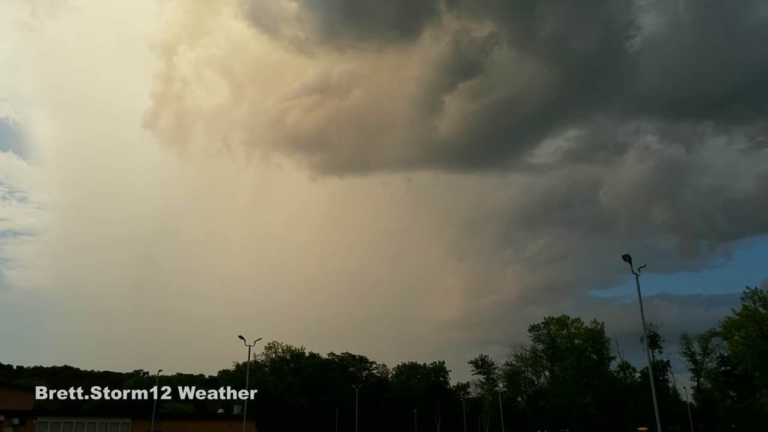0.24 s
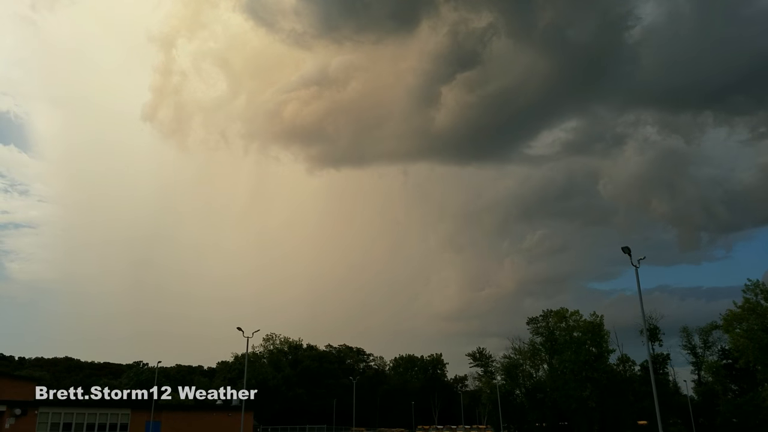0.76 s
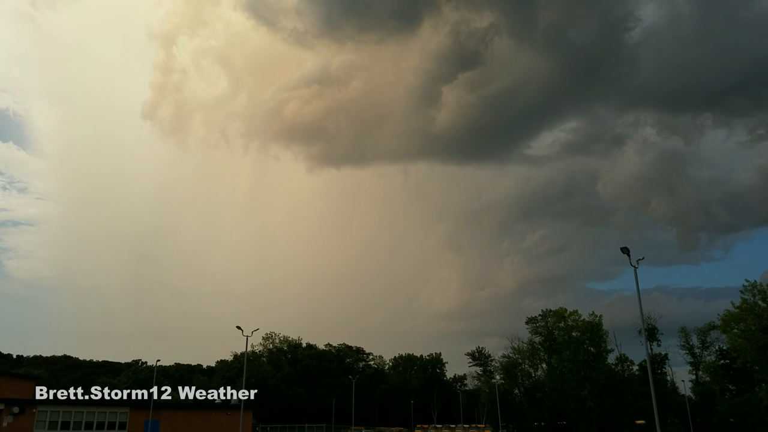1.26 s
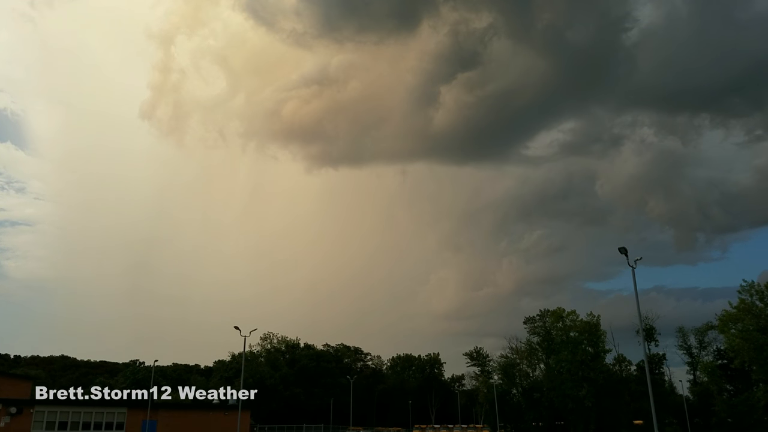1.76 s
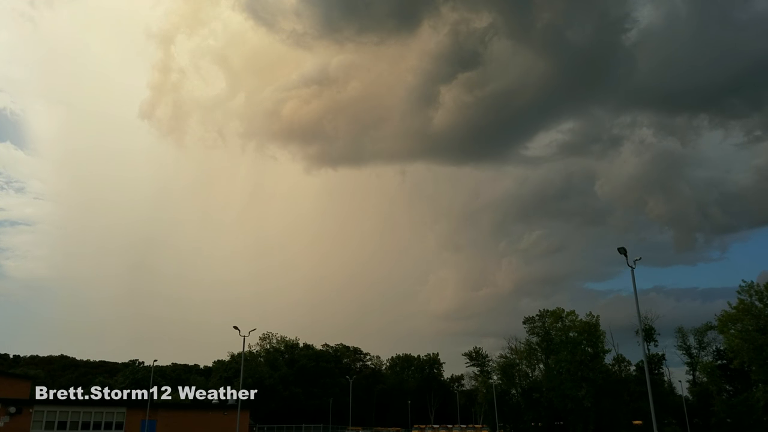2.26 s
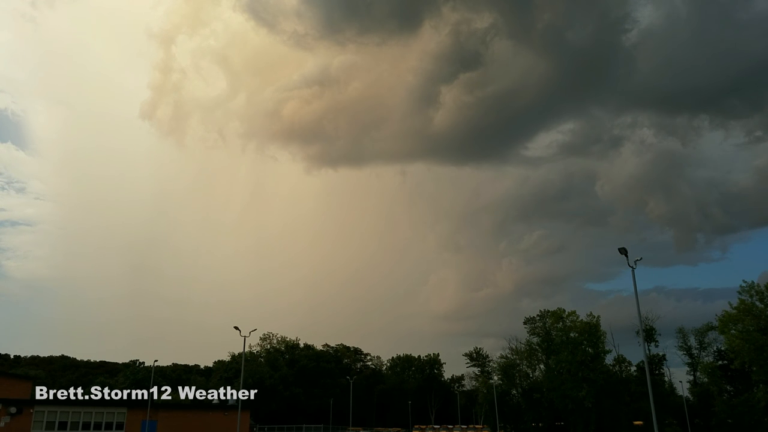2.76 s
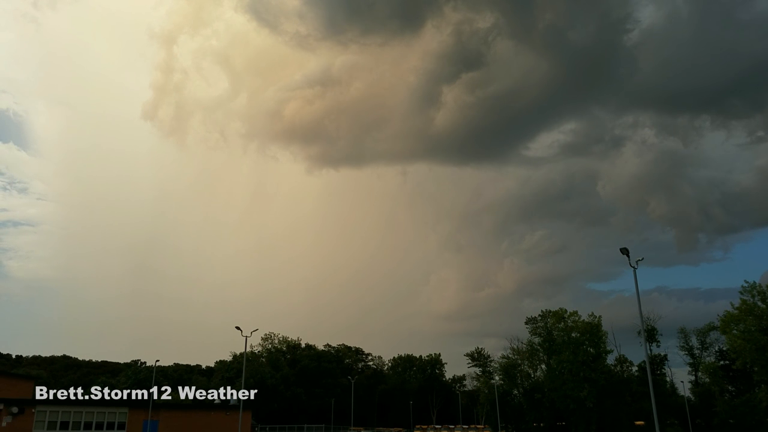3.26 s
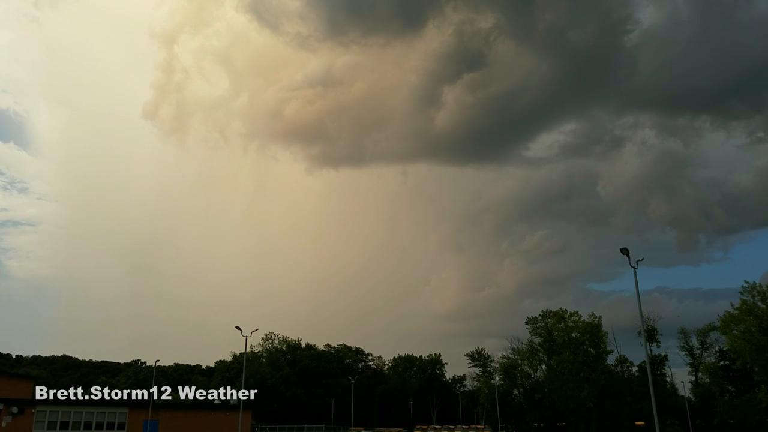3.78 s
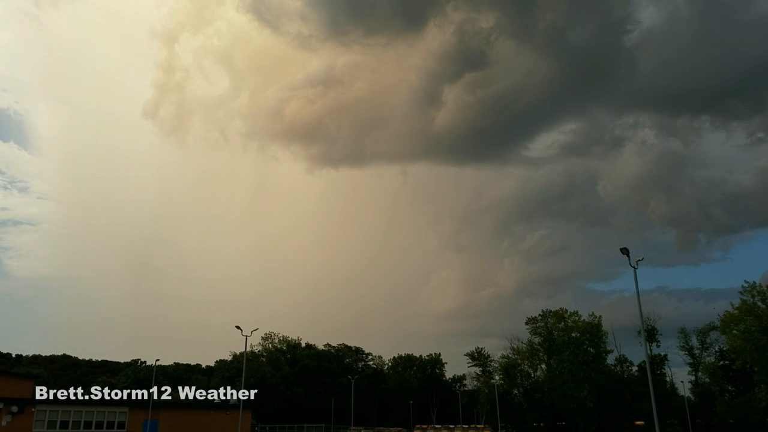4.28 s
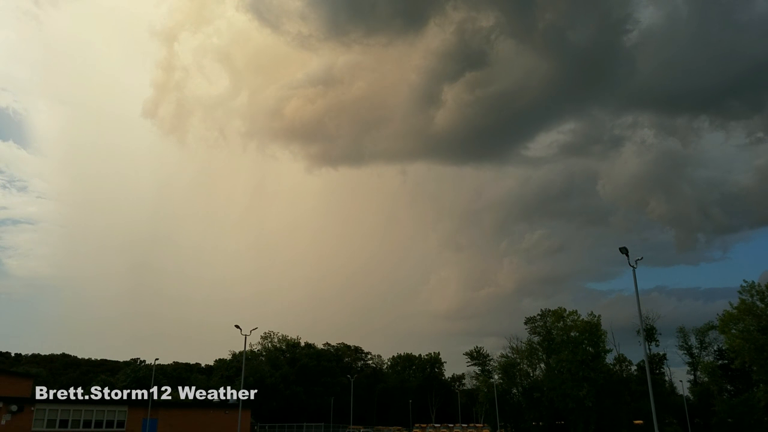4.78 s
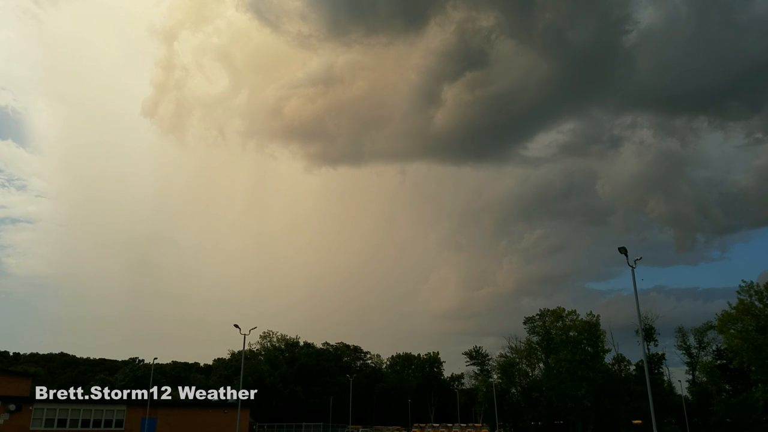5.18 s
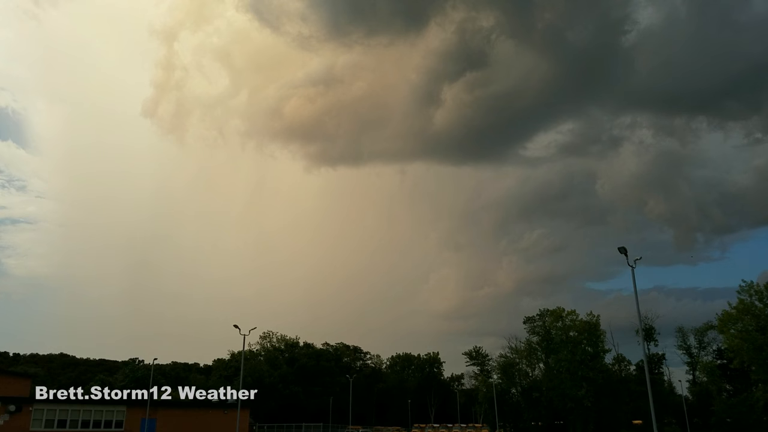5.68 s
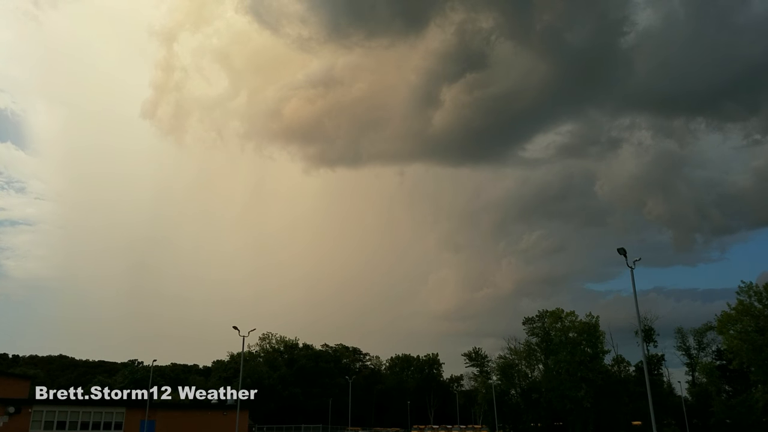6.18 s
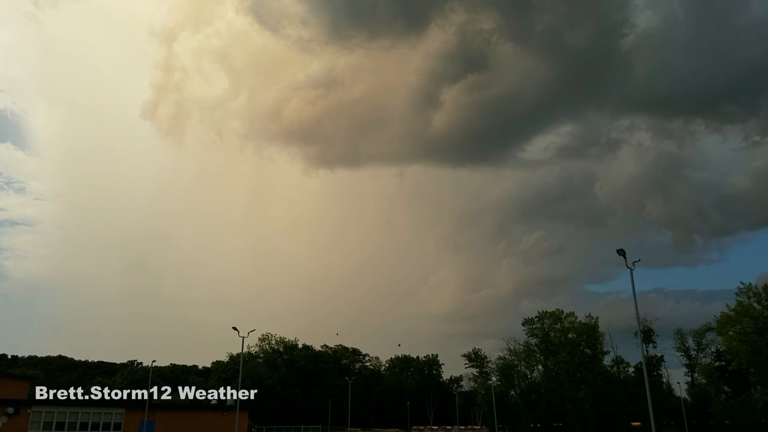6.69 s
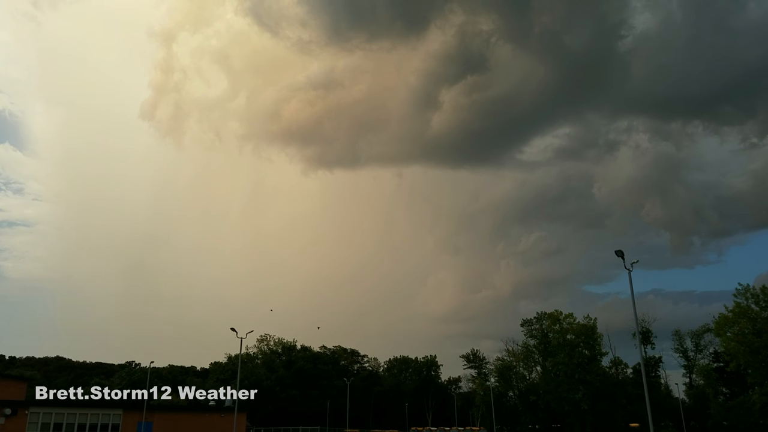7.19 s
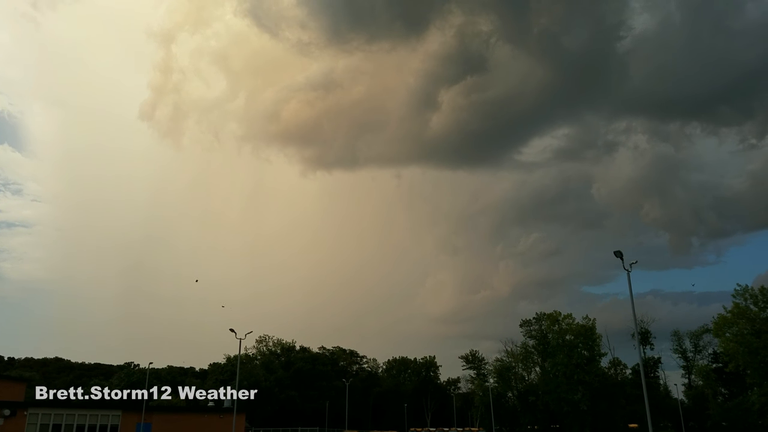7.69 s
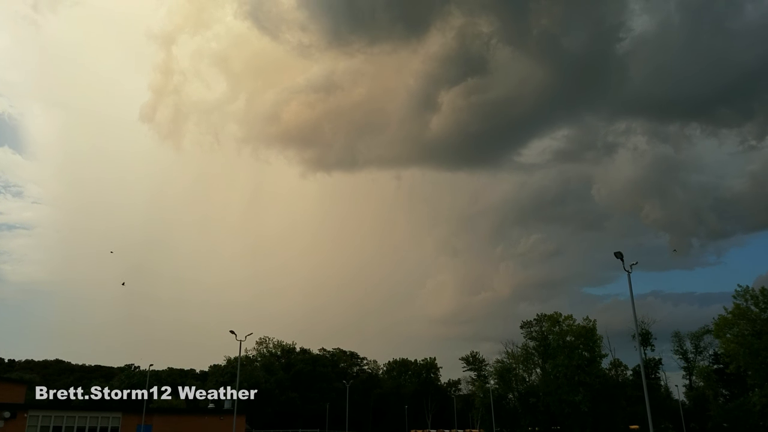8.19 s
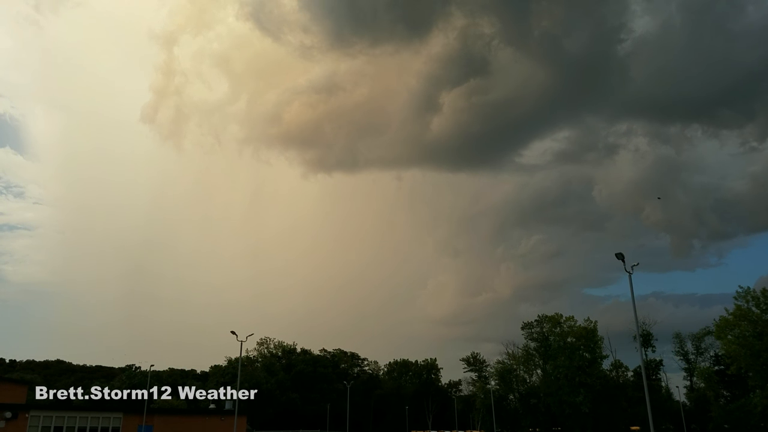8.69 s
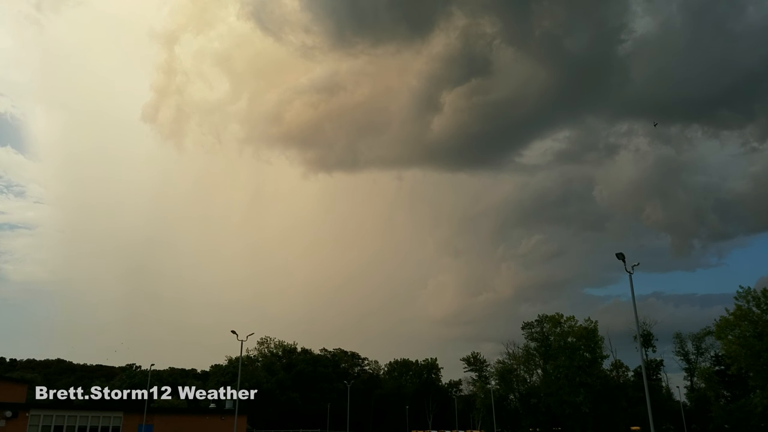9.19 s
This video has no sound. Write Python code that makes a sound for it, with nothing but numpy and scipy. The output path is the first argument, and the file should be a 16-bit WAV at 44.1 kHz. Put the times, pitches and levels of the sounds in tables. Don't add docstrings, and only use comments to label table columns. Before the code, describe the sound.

Violent crackling thunderclap breaks into a long deep rumble, surging again with heavy thuds and later claps, faint leaves and bird calls underneath.

```python
import sys
import numpy as np
from scipy import signal
from scipy.fft import rfft, irfft, next_fast_len
from scipy.io import wavfile
from scipy.ndimage import uniform_filter1d

SR = 44100
rng = np.random.default_rng(int(sys.argv[2]) if len(sys.argv) > 2 else 0)


def digitize_waveform(pressure):
    field = np.atleast_2d(pressure).T
    bounded = np.clip(field, -1, 1)
    quanta = np.round(bounded * 32767).astype(np.int16)
    wavfile.write(sys.argv[1], SR, quanta)


def field_ratio(decibels):
    return 10 ** (np.asarray(decibels, dtype=float) / 20)


N = 416744
T = np.arange(N) / SR
COARSE = T[::32]


def unit(x):
    return x / np.sqrt(np.mean(x ** 2) + 1e-30)


def shape(x, points):
    hz, db = np.transpose(points)
    size = 2 * next_fast_len(x.shape[-1] // 2 + 1)
    f = np.maximum(np.fft.rfftfreq(size, 1 / SR), 1)
    gain = field_ratio(np.interp(np.log(f), np.log(hz), db))
    cepstrum = irfft(np.log(gain), size)
    cepstrum[1:size // 2] *= 2
    cepstrum[size // 2 + 1:] = 0
    return irfft(rfft(x, size) * np.exp(rfft(cepstrum)), size)[..., :x.shape[-1]]


def tint(group, points):
    out = shape(group, points)
    return out * np.sqrt(np.mean(group ** 2) / np.mean(out ** 2))


def walk(rate_hz):
    held = rng.standard_normal(2000)[(COARSE * rate_hz).astype(int)]
    k = int(len(COARSE) / COARSE[-1] / rate_hz)
    return 1.37 * uniform_filter1d(uniform_filter1d(held, k), k)


def add(out, s, piece):
    at = max(int(s * SR), 0)
    angle = np.linspace(0, np.pi / 2, piece.shape[1]) ** 4 / (np.pi / 2) ** 3
    piece = piece * np.cos(angle) ** 2
    out[:, at:at + piece.shape[1]] += piece[:, :N - at]


def pair(s, wave, lag_ms, length_s):
    lag_s = lag_ms[int(s * SR)] / 1000
    t = np.arange(int(length_s * SR)) / SR - .001 + np.array([[-lag_s / 2], [lag_s / 2]])
    return wave(np.maximum(t, 0))


def shocks(length, count, scatter_db, lag_ms, spread_ms):
    chance = rng.standard_normal((count, 2))
    at = np.sort(rng.random(count)) * (length - 1)
    size = np.sign(chance[:, 0]) * field_ratio(scatter_db * np.abs(chance[:, 0]))
    lag = (np.interp(at, np.arange(length), lag_ms) + spread_ms * chance[:, 1]) * SR / 1000
    out = np.zeros((2, length))
    for row, place in zip(out, np.clip((at + lag / 2, at - lag / 2), 0, length - 2)):
        whole = place.astype(int)
        part = place - whole
        row += np.bincount(whole, size * (1 - part), length)
        row += np.bincount(whole + 1, size * part, length)
    return out


def cluster(s, t60_s, lag_ms, lead):
    t = T[:SR // 4] - .01
    lag = lag_ms[int(s * SR)]
    group = shocks(len(t), count=1500, scatter_db=3.5, lag_ms=np.full(len(t), lag), spread_ms=0.1)
    rise_s = 0.00067 * s + 1 / SR
    group = unit(group) * np.clip(t / rise_s, 0, 1) * field_ratio(-60 * t / max(t60_s, .02))
    half_lag = int(round(lag * SR / 2000))
    group[(0, 1), SR // 100 + 20 + np.array([1, -1]) * half_lag] += lead
    return group


def hush():
    # time in s, level in dB.
    hush_level = [(0, -74), (.35, -76), (.9, -93), (1.6, -97), (2.2, -93), (2.9, -82.5), (3.3, -86),
                  (3.5, -80), (4.3, -76.5), (9.45, -75.5)]
    # frequency in Hz, density in dB per Hz.
    hush_colour = [(600, -23), (2000, 5), (3000, 0), (3900, 7.5), (5000, -1), (7500, -11), (9700, -11.5),
                   (14500, -3.5), (15800, -4.5)]
    s, db = np.transpose(hush_level)
    noise = unit(shape(rng.standard_normal((2, N)), hush_colour))
    steady = field_ratio(-85.0) * rng.standard_normal((2, N))
    level_db = np.interp(COARSE, s, db) + 11.5 + 0.57 * walk(8.2)
    return noise * np.interp(T, COARSE, field_ratio(level_db)) + steady


def bird():
    # start in s, level in dB, pitch in Hz.
    calls = [
        (5.54, -84, 8800),
        (5.87, -74, 8800),
        (6.055, -72, 9000),
        (6.43, -69.5, 8900),
        (8.555, -64, 4350),
    ]
    out, t = np.zeros((2, N)), T[:SR // 30]
    for s, db, hz in calls:
        high = hz > 6000
        partials = (1, 1.24) if high else (1,)
        tone = sum(np.sin(2 * np.pi * k * hz * t * (1 - .8 * t * high)) for k in partials)
        add(out, s, field_ratio(db) * np.hanning(len(t)) * tone * np.ones((2, 1)))
    return out


def heights():
    # time in s, level in dB.
    channel = [(0, -18), (.03, -7), (.29, 3), (.87, -4), (1.24, -3.5), (1.4, 1.5), (2.0, -0.5), (2.9, -2.5),
               (3.42, -1.5), (3.6, 5.5), (4.16, 3), (4.76, 0), (5.7, -0.5), (5.9, 4.5), (7.0, 1.5),
               (7.9, 3), (8.3, -1), (9.45, -1.5)]
    # peak in s, lift in dB, fall in s.
    swells = [(.4, 16.5, 0.41), (1.079, 23, 0.14), (1.32, 10.5, 0.38), (1.891, 16, 0.14), (2.79, 5.5, 0.19),
              (3.5, 5.5, 0.091), (5.53, 8, 0.14), (5.809, 16, 0.25), (6.34, 4, 0.42), (6.62, 7.5, 0.19),
              (7.03, 7.5, 0.12), (7.19, 1.5, 0.15), (7.61, 7, 0.2), (8.0, 7.5, 0.2), (8.64, 4, 0.23)]
    # level in dB, loss to the air in dB per s, share of strength, share of a swell.
    layers = [
        (-23, 0.16, 0.36, 0.34),
        (-27, 0.32, .9, 0.77),
        (-25, 1.5, 1.05, 0.31),
        (-33, 3.5, 0.67, 0.31),
    ]
    swell_rise_s = 0.067
    strength = np.interp(COARSE, *np.transpose(channel))
    swell = sum(np.interp(COARSE, (s - swell_rise_s, s, s + fall_s), (0, db, 0)) for s, db, fall_s in swells)
    out = np.array([db - loss * COARSE + a * strength + b * swell for db, loss, a, b in layers])
    deep_arrives_s, deep_rise_s = 1.384, 0.16
    out[0] += -12.5 * np.clip((deep_arrives_s - COARSE) / deep_rise_s + .5, 0, 1)
    return out


def roll(lag_ms):
    height_hz = (125, 420, 1200, 3000)
    # frequency in Hz, density in dB per Hz.
    roll_colour = [(13, -59), (22, -33), (43, -24.5), (119, -6), (171, -2.5), (228, -6.5), (388, -11),
                   (1570, -20.5), (1950, -23), (3010, -34.5), (3740, -39.5), (4540, -41.5), (6100, -54.5),
                   (7000, -70), (9100, -111), (15400, -120)]
    colour_hz, colour_db = np.transpose(roll_colour)

    def band_db(hz):
        return np.interp(np.log(hz), np.log(colour_hz), colour_db) + 10 * np.log10(hz)

    height_db = heights() - np.array([[band_db(hz)] for hz in height_hz])
    size = next_fast_len(N)
    octaves = np.log2(np.maximum(np.fft.rfftfreq(size, 1 / SR), 1))
    train = rfft(shocks(N, count=40000, scatter_db=2.5, lag_ms=lag_ms, spread_ms=0.1), size)
    surge_db = (2.6 - .2 * COARSE) * walk(38)
    out = 0
    for hz in 25 * 2 ** np.arange(0, 8.4, .4):
        window = np.cos(np.pi / 2 * np.clip((octaves - np.log2(hz)) / .4, -1, 1)) ** 2
        band = unit(irfft(train * window, size)[:, :N])
        place = np.interp(np.log(hz), np.log(height_hz), np.arange(4))
        k = min(int(place), 2)
        db = height_db[k] + (place - k) * (height_db[k + 1] - height_db[k])
        db -= max(np.log2(hz / height_hz[-1]), 0) * (9.9 * COARSE - 5.0)
        flutter_db = np.clip(3.8 - 1.3 * abs(np.log(hz / 400)), .5, 6) * (1 - COARSE / 25) * walk(30)
        db += band_db(hz) - 9.5 + surge_db + flutter_db
        out = out + band * np.interp(T, COARSE, field_ratio(db))
    return out


def booms(lag_ms):
    # start in s, peak in dB, length in cycles.
    ground_thumps = [(.331, -3.5, 1.34), (1.115, -13, 1.9), (1.561, -8.5, 1.8), (1.679, -2.5, 0.73),
                     (1.778, -10.5, 1.3), (1.907, -6.5, 1.3), (1.977, -4, 1.74), (2.651, -1, 0.62),
                     (2.674, 2, 0.99), (2.783, 0, 1.34), (3.583, -10, 1.9), (3.659, -4, 1.5),
                     (3.72, 0, 1.7), (3.833, -2.5, 0.72), (3.901, -11, 2), (4.362, -3.5, 1.55),
                     (5.763, -2, 0.82), (5.978, -17, 1.5), (6.43, -6, 1.8), (6.455, -10, 1.1),
                     (6.558, -4, 1), (6.672, 2, 1.45), (6.728, -9, 1.4), (6.809, -5, 1.75),
                     (6.968, -16, 2.6), (7.053, -8.5, 2.2), (7.237, -8, 2.9), (7.275, -8, 2),
                     (7.81, -15, 1.8), (9.147, -5, 1.94)]
    # start in s, peak in dB,
    # pitch in Hz, length in cycles.
    thuds = [(.33, -17.5, 78.6, 1.5), (0.448, -11.5, 95, 0.91), (.58, -27, 75, 1.8), (.597, -8.5, 265, 3.5),
             (.706, -13, 248, 2.9), (.764, -9, 252, 1.85), (.74, -27.5, 71, 2.7), (1.3, -6.5, 232, 1.1),
             (1.447, -11, 226, 2), (1.655, -22, 96.9, 1.24), (1.878, -9, 199, 1.7), (2.485, -23, 144, 1),
             (2.645, -2, 221, .76), (2.784, -19, 86.1, 0.7), (3.038, -7, 132, 1), (3.722, -20, 82.5, 1.2),
             (4.362, -24, 108, 1.1), (4.9, -15, 200.3, 2.9), (5.08, -2.5, 145, 0.98),
             (5.454, -11.5, 152, 0.96), (5.8, -9, 91, 1.6), (5.825, -3, 151, 1), (6.12, -27, 74, 1.9),
             (6.426, -18, 86, 1.7), (6.428, -10.5, 111, 1.86), (6.64, -21.5, 85.6, 1.3),
             (7.387, -17.5, 131, 2.1), (7.945, -12, 134, 1.1), (8.874, -24, 147, 3.4),
             (9.132, -18, 102, 2.4),
             (1.75, -15, 164, 1.6), (1.939, -8.5, 186, 1.6), (2.009, -10.5, 175, 2),
               (2.165, -12.5, 180, 2.1), (2.619, -11, 178, 1.7), (2.809, -5.5, 172, 1.4),
               (2.838, -14, 175, 1.6), (2.869, -15.5, 137, 1.3), (4.339, -10, 161, 1.3),
               (4.398, -12.5, 135, 1.5), (4.619, -22, 147, 1.6), (4.876, -17, 132, 1.3),
               (4.926, -12, 173, 1.4), (5.239, -16, 185, 1.6), (6.459, -9, 280, 1.9),
               (7.449, -11, 129, 2.1), (7.619, -10, 280, 1.9), (7.745, -17, 166, 1.6),
               (7.97, -13, 160, 1.1), (8.699, -17, 137, 1.6)]
    # s, dB, Hz, cycles.
    hums = [(.34, -7.5, 431, 6.5), (.37, -8.5, 400, 5), (.415, -8, 520, 7), (.44, -5, 450, 6.3),
            (.465, -6, 418, 6), (.53, -9, 390, 5.6), (.6, -11, 410, 5.5), (.625, -10.5, 399, 9),
            (.665, -11, 338, 5.8), (5.88, -7.5, 175, 1.8), (5.92, -11, 190, 1.6), (6.03, -13.5, 169, 1.8),
            (6.09, -12.5, 168, 2.2), (6.21, -13, 174, 2.2), (6.33, -18, 410.4, 9.4), (6.37, -16, 377, 8.4),
            (7.33, -19.5, 400, 10.3), (7.6, -14, 269, 4), (.98, -16, 418, 8)]
    # start in s, peak in dB, pitch in Hz.
    rings = [(0.022, -23, 427), (0.179, -18, 527), (0.226, -16, 278), (0.271, -9, 293), (0.329, -5, 413),
             (0.421, -9, 428), (0.52, -2, 305), (0.594, -13, 388), (0.767, -11.5, 285), (0.915, -14, 482),
             (0.952, -17, 517), (0.999, -16, 458), (1.044, -6.5, 496), (1.12, -4.5, 408), (1.185, -13, 498),
             (1.265, -12, 396), (1.302, -9, 398), (1.371, -9, 412), (1.471, -12, 317), (1.51, -6, 356),
             (1.555, -6, 496), (1.653, -10.5, 290), (1.878, -7, 300), (1.945, -5, 332), (1.974, -3.5, 326),
             (2.304, -11, 511), (2.365, -12, 517), (2.481, -14, 290), (2.611, -13, 280), (2.674, -10, 296),
             (2.871, -14, 318), (3.482, -8.5, 298), (3.586, -11, 312), (3.657, -13.5, 332),
             (3.719, -8.5, 323), (3.804, -16.5, 484), (4.071, -10, 498), (5.335, -15.5, 291),
             (5.457, -18, 270), (5.755, -8, 415), (5.803, -0.5, 374), (5.905, -5.5, 417), (5.975, -13, 285),
             (6.072, -7, 452), (6.311, -8, 392), (7.171, -8, 355), (7.22, -8, 296), (7.272, -11, 310),
             (7.361, -10, 382), (7.596, -6, 274)]
    ground_hz, ring_db, ring_cycles = 169.5, -3.5, 2.58
    echo_s, echo_db = .028, -8.5
    swings = [(s, db, ground_hz, cycles) for s, db, cycles in ground_thumps] + thuds + hums
    swings += [(s, db + ring_db, hz, ring_cycles) for s, db, hz in rings]
    out = np.zeros((2, N))
    for s, db, hz, cycles in swings:
        tau = cycles / hz

        def wave(t):
            envelope = (t / tau) ** 2 * np.exp(2 - 2 * t / tau)
            return envelope * np.sin(2 * np.pi * hz * t * (1 - 1.3 * t))

        thump = field_ratio(db - 3.0) * pair(s, wave, lag_ms, length_s=.16)
        add(out, s - .004, thump)
        add(out, s - .004 + echo_s, field_ratio(echo_db) * thump)
    return out


def claps(lag_ms):
    # start in s, peak in dB, pitch in Hz, edge in dB over the peak.
    near_claps = [(.023, -11.5, 400, -4.5), (.092, -11.5, 405, -8), (.135, -13, 372, -26),
                  (.18, -14.5, 513, -26), (.228, -9.5, 320, -18), (.303, -6.5, 387, -9),
                  (.326, -1, 325, -7.5), (.353, 1, 470, -41), (.425, -4, 530, -25), (.475, -1, 430, -24),
                  (.519, -2, 369, -12), (.544, -3, 377, -15), (.593, -5, 400, -34), (.64, -9, 388, -16),
                  (.709, -7, 538, -19), (.765, -7, 775, -12), (.864, -8.5, 523, -29),
                  (.916, -7.5, 480, -19), (.954, -6.5, 506, -19), (1.0, -5.5, 458, -11.5),
                  (1.12, -10.5, 410, -27), (1.265, -10, 423, -26), (1.302, -3.5, 387, -13),
                  (1.326, -4, 413, -11), (1.371, -8, 420, -40), (1.439, -10, 423, -6), (1.467, -6, 700, -7),
                  (1.51, -10, 370, -7), (1.559, -4, 450, -13.5), (1.672, -7.5, 520, -11)]
    # s, dB, Hz, dB.
    far_claps = [(1.749, -10, 380, -7.5), (1.853, -30, 395, -19.5), (1.974, -4.5, 332, -13),
                 (2.046, -13, 573, -20), (2.305, -9.5, 503, -9), (2.477, -11.5, 333, -11),
                 (2.612, -18.5, 452, -11), (2.672, -13, 478, -5.5), (2.768, -6, 336, -13),
                 (3.033, -18, 730, -20), (3.189, -20, 485, -3), (3.434, -13, 534, -17),
                 (3.478, -8.5, 333, -17), (3.64, -17, 400, -9), (3.721, -6, 343, -17),
                 (3.804, -11, 484, -8), (4.027, -20, 330, -8), (4.074, -9, 517, -16),
                 (4.199, -15, 517, -4.5), (4.27, -10, 500, -13), (4.325, -12, 604, -10.5),
                 (5.542, -14.5, 485, -23), (5.8, -0.5, 360, -23), (5.904, -14, 411, -25),
                 (6.312, -8.5, 406, -29), (7.17, -9, 376, -26.5), (7.595, -7.5, 399, -25),
                 (7.618, -5.5, 333, -25.5), (7.95, -18, 342, -13), (8.6, -17, 403, -17)]
    # start in s, peak in dB, pitch in Hz, edge in dB over the peak, t60 in s.
    long_claps = [
        (.449, -1, 473, -19, .2),
        (.617, -1.5, 577, -17, .2),
        (1.045, -9, 500, -19, 0.42),
        (3.57, -17, 393, -7, .45),
        (5.335, -15, 612, -16, 0.39),
        (5.751, -9, 404, -31, 0.15),
        (5.753, -6, 480, -33, 0.39),
        (8.679, -16.5, 340, -21, 0.29),
    ]

    def lasting(rows, t60_s, s_per_edge_db):
        return [(*row, t60_s - 0.0173 * (row[1] + 10) + s_per_edge_db * (row[3] + 20)) for row in rows]

    groups = lasting(near_claps, 0.12, 0) + lasting(far_claps, 0.15, 0.03) + long_claps
    edge_t60_s = 0.33
    out = np.zeros((2, N))
    for s, db, hz, edge_db, t60_s in groups:
        group = cluster(s, t60_s, lag_ms, lead=7.0)
        body = tint(group, [(hz / 8, -90), (hz / 1.59, -22), (hz / 1.165, -7), (hz, 0), (hz * 1.1, -7),
                            (hz * 3, -18 - 0.29 * s), (hz * 8, -110)])
        edge = tint(group, [(300, -91.0), (800, -14.5), (1500, 0.0), (2500, -5 - 0.53 * s),
                            (4000, -14 - 4.3 * s), (9000, -110)])
        edge_gain = field_ratio(edge_db + 3.0 - 60 * T[:SR // 4] / edge_t60_s)
        add(out, s - .0115, field_ratio(db - 8.0) * (body + edge_gain * edge))
    return out


def tears(lag_ms):
    # start in s, peak in dB, pitch in Hz, t60 in s.
    rips = [
        (0.0914, -15.5, 2120, 0.18),
        (0.2018, -15.5, 2660, 0.17),
        (0.23, -15.5, 2070, 0.061),
        (0.2729, -12, 2180, 0.18),
        (0.288, -13, 2970, 0.071),
    ]
    out = np.zeros((2, N))
    for s, db, hz, t60_s in rips:
        rip = tint(cluster(s, t60_s, lag_ms, lead=0),
                   [(hz / 3, -90), (hz / 1.7, -8), (hz, 0), (hz * 1.24, -5), (hz * 3.2, -60)])
        add(out, s - .01, field_ratio(db - 4.5) * rip)
    return out


def strikes(lag_ms):
    # start in s, peak in dB, pitch in Hz, t60 in s.
    single_shocks = [(1.698, -15, 850, 0.065), (1.737, -15, 1040, 0.06), (1.777, -13.5, 1040, 0.06),
                     (1.852, -24, 1060, 0.06), (1.891, -13, 810, 0.068), (1.942, -13.5, 1230, 0.06),
                     (1.975, -12.5, 880, 0.05), (2.046, -19, 832, 0.06), (2.304, -11.5, 1310, 0.056),
                     (2.365, -19, 1010, 0.065), (2.415, -19, 1000, 0.06), (2.479, -19, 1010, 0.06),
                     (2.624, -17, 1010, 0.076), (2.672, -25, 970, 0.055), (2.709, -16, 1130, 0.088),
                     (2.772, -16, 807, 0.06), (2.782, -11, 810, 0.076), (3.034, -15.5, 1030, 0.046),
                     (3.436, -19, 974, 0.053), (3.48, -19.5, 1370, 0.06), (3.578, -16, 1360, 0.06),
                     (3.642, -15, 1380, 0.06), (3.722, -16, 966, 0.065), (4.03, -18.5, 985, 0.067),
                     (4.07, -17, 821, 0.054), (4.092, -14.5, 1146, 0.067), (4.278, -17, 1150, 0.081),
                     (4.323, -13, 818, 0.071), (4.819, -18, 850, 0.06), (5.335, -23, 802, 0.055),
                     (5.458, -21, 1050, 0.06), (5.577, -20, 802, 0.074), (5.761, -20, 880, 0.06),
                     (6.073, -17, 883, 0.06), (6.315, -19, 883, 0.06), (6.605, -19.5, 958, 0.072),
                     (7.171, -21, 810, 0.06), (7.593, -22, 974, 0.06), (7.627, -15.5, 848, 0.06),
                     (7.722, -15, 855, 0.068)]
    out, t = np.zeros((2, N)), T[:SR // 16]
    for s, db, hz, t60_s in single_shocks:
        lag = np.full(len(t), lag_ms[int(s * SR)])
        spray = unit(shocks(len(t), count=250, scatter_db=5.0, lag_ms=lag, spread_ms=.12))
        spray *= np.minimum(t / .0012, 1) * field_ratio(-60 * t / t60_s)
        spray = tint(spray, [(hz / 5, -60), (hz / 1.8, -9), (hz, 0), (hz * 2.02, -10 - .8 * s),
                             (hz * 3.6, -27 - 3.8 * s), (8000, -110)])
        add(out, s - .001, field_ratio(db - 6.0) * spray)
    return out


def cracks(lag_ms):
    # start in s, peak in dB, 3-6 kHz part in dB over the peak.
    fronts = [(0.3264, -30.5, 10), (.3414, -40, 23.5), (.3544, -41, 12), (0.4485, -37.5, 14),
              (0.525, -34, 15), (.5487, -32.5, 11.5), (.604, -33.5, 11.5), (.633, -44.5, 17),
              (.677, -44.5, 19.5), (0.714, -46, 15), (0.7686, -44, 14.5), (.917, -49, 14),
              (.954, -50, 17.5), (1, -49, 20), (1.0637, -55, 23.5), (1.1203, -50.5, 13), (1.301, -41.5, 11),
              (1.329, -50, 20), (1.345, -54, 20), (1.4376, -53, 20), (1.4524, -48.5, 21), (1.4716, -49, 19),
              (1.515, -54.5, 21), (1.5593, -47.5, 16), (1.672, -50, 17), (1.9766, -59, 13),
              (2.3045, -70, 21), (2.6497, -65.5, 24), (2.784, -68, 20), (3.0344, -72, 26)]
    out, length = np.zeros((2, N)), SR // 20
    t = T[:length]
    for s, db, low_db in fronts:
        noise = rng.standard_normal((2, length))
        far_db = 6.0 * s + 0.59 * (-31.5 - db)
        lag = int(lag_ms[int(s * SR)] * SR / 1000)
        front = np.array([np.roll(noise[0], lag), noise[0]]) + 0.64 * noise[::-1]
        top = unit(shape(noise, [(4500, -52.5), (6500, 3.5), (9000, -4 - 0.35 * far_db),
                                 (12000, -4 - 0.36 * far_db), (16000, -2 - far_db)]))
        low = unit(shape(front, [(1800, -43.5), (3000, 7), (4500, 4.5), (6000, -8.5), (9000, -64.5),
                                 (14000, -100)]))
        top *= field_ratio(np.array([[-2.5], [2.5]])) * (np.exp(-t / 0.0017) + field_ratio(-13.5) * np.exp(-t / 0.01))
        low_decay = np.exp(-t / 0.0014) + field_ratio(-8.5) * np.exp(-t / 0.0091)
        low *= field_ratio(low_db) * np.minimum(t / 0.00043, 1) * low_decay
        add(out, s, field_ratio(db - 0.5) * (top + low))
    return out


def scene():
    # time in s, lag of the left microphone in ms.
    bearing = [
        (0, 0.23),
        (1.7, 0.17),
        (2.6, -0.022),
        (4.5, -0.098),
        (7, -0.083),
        (9.45, -0.097),
    ]
    lag_ms = np.interp(T, *np.transpose(bearing))
    sky = hush() + bird() + roll(lag_ms) + booms(lag_ms)
    sky += claps(lag_ms) + tears(lag_ms) + strikes(lag_ms) + cracks(lag_ms)
    left_db = -2.02 + 1.3 * np.clip(1 - T / 2.1, 0, 1)
    return sky * field_ratio(np.array([left_db, -left_db]) / 2)


def band_limit(x):
    return signal.sosfilt(signal.butter(12, 16520, fs=SR, output="sos"), x)


def record(dry):
    rounded = dry / (1 + np.abs(dry) ** 8) ** (1 / 8)
    cut = shape(rounded, [(15800, 0), (15950, -70)])
    return band_limit(cut)


dry = scene()
out = record(dry)
digitize_waveform(out)
```